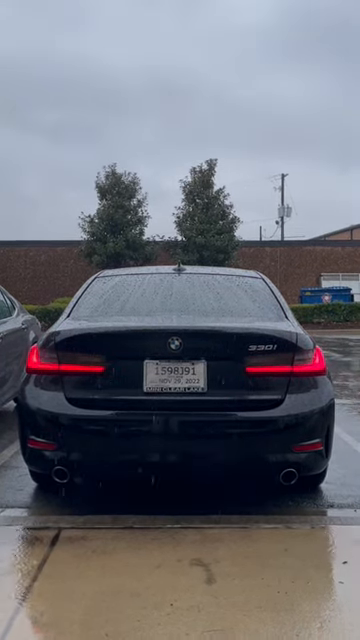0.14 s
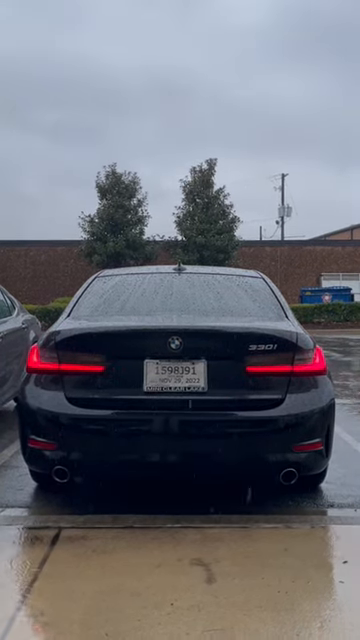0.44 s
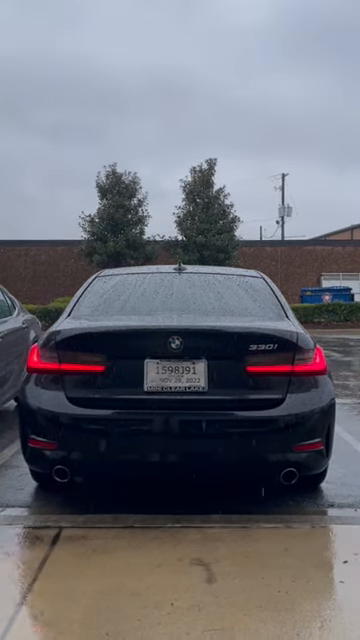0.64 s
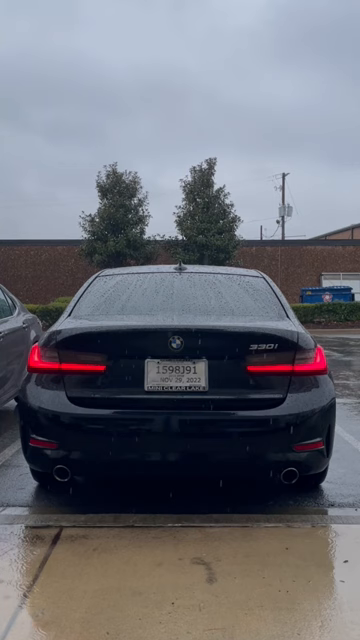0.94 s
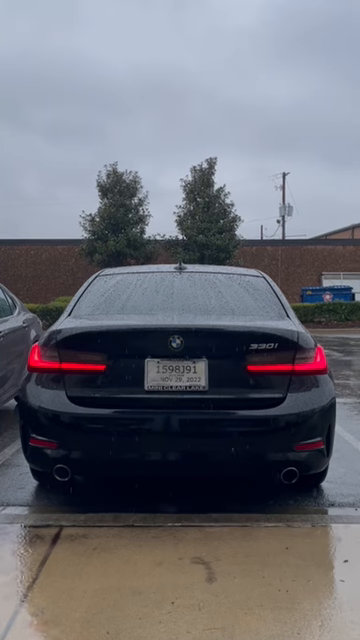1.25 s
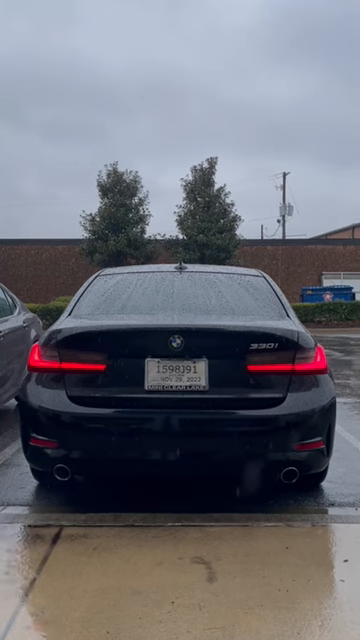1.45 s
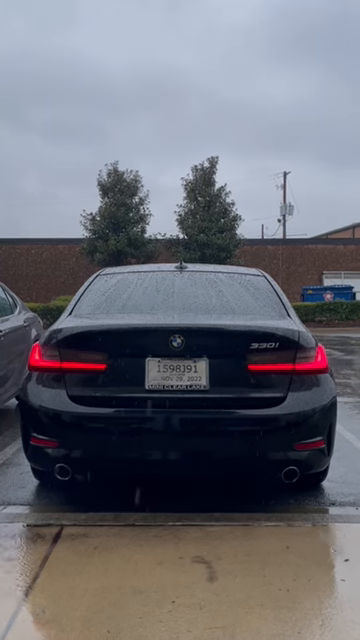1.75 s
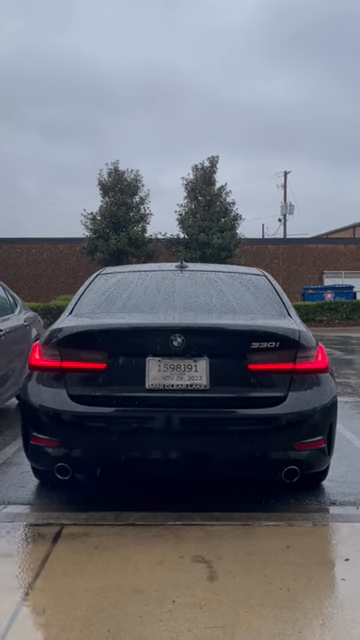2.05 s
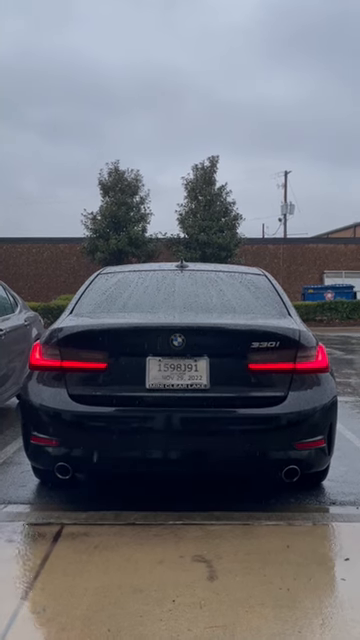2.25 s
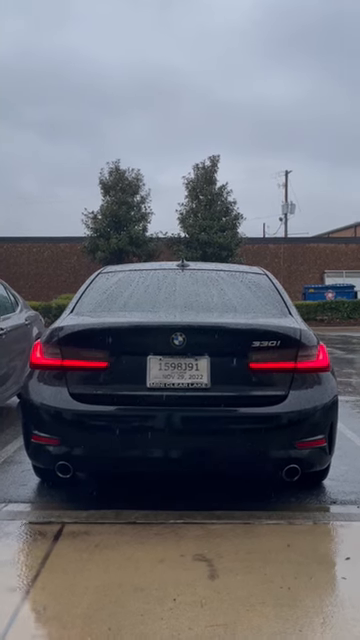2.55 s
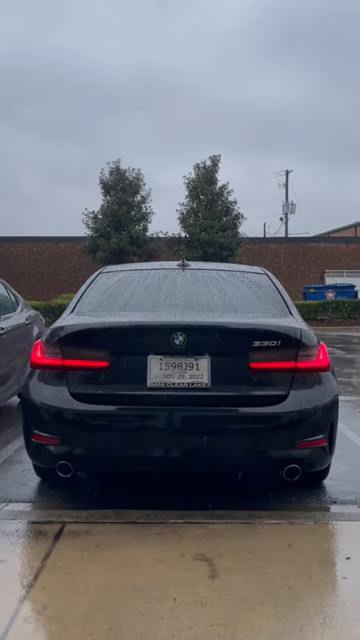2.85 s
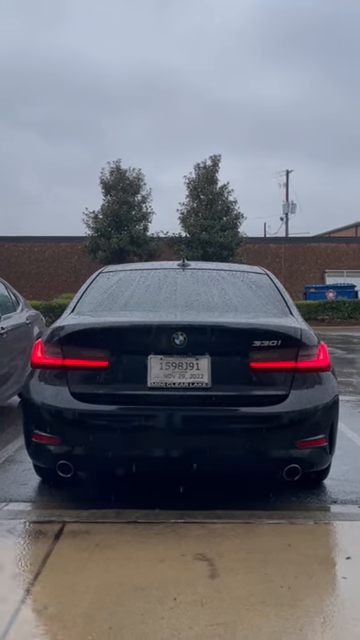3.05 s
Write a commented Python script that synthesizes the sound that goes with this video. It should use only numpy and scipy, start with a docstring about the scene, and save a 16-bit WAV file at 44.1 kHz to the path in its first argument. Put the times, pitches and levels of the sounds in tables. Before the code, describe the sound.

A parked car idles throughout, a low humming exhaust throb with breathy pulsing gas and hollow pipe ringing, heard outdoors from a few metres behind. It sags until 1.25 s, picks up slightly until about 1.9 s, then slows to the end. Drizzle hisses, its treble swelling until 1.6 s. Tiny drops tick throughout, sharpest near 0.38 s; faint thin whines pass at 0.5-0.8 s.

```python
"""A parked four-cylinder car idles in light rain, heard from a few metres behind its tailpipes.
From the start its firings hum in the exhaust, and each puffs out gas that rushes and rings the pipe.
Drizzle hisses throughout, with an unsteady treble hiss on top that swells until 1.6 s.
Drops tick on the ground and bodywork, the loudest near 0.38 s; faint whines pass from 0.5 to 0.8 s.
The idle sags until 1.25 s, picks up until about 1.9 s, then sags again to its slowest at the end."""
import sys
import numpy as np
from scipy import signal
from scipy.fft import rfft, irfft
from scipy.io import wavfile
from scipy.ndimage import uniform_filter1d

SR = 44100
rng = np.random.default_rng(int(sys.argv[2]) if len(sys.argv) > 2 else 0)


def inscribe(sig):
    """Save sig as 16-bit PCM at rate SR to the path in sys.argv[1].

    A 1-D sig is mono; a 2-D sig holds one channel per row.
    Samples are clipped to [-1, 1] before scaling.
    """
    pcm = np.round(np.clip(np.atleast_2d(sig).T, -1, 1) * 32767)
    wavfile.write(sys.argv[1], SR, pcm.astype(np.int16))


N = 141120


def undb(db):
    """Turn decibels into a gain."""
    return 10 ** (np.asarray(db) / 20)


def unit(x):
    """Scale a sound to an rms (average strength) of 1."""
    return x / np.sqrt(np.mean(x ** 2))


def pan(x, left_minus_right_db):
    """Place a sound by making one side louder and the other softer."""
    return x * undb(np.array([[left_minus_right_db], [-left_minus_right_db]]) / 2)


def read_curve(x, points):
    """Read a curve at x, with straight lines between its points."""
    return np.interp(x, *np.array(points).T)


def wander(rate_hz):
    """A smooth random curve with a spread near 1: random steps, averaged twice."""
    step = int(SR / rate_hz)
    steps = np.repeat(rng.standard_normal(N // step + 1), step)
    smooth = uniform_filter1d(uniform_filter1d(steps, step), step)
    return 1.4 * smooth[:N]


def noise(spectrum):
    """Random noise of rms 1, its pitch balance shaped by (frequency [Hz], level [dB]) points."""
    hz, db = np.array(spectrum).T
    freqs = np.maximum(np.fft.rfftfreq(N, 1 / SR), 1)
    gain = undb(np.interp(np.log(freqs), np.log(hz), db))
    return unit(irfft(rfft(rng.standard_normal(N)) * gain, N))


def resonate(x, hz, width_hz):
    """Ring at one pitch; filtering twice makes the resonance's skirts steep."""
    b, a = signal.iirpeak(hz, hz / width_hz / np.sqrt(2), fs=SR)
    once = signal.lfilter(b, a, x)
    return signal.lfilter(b, a, once)


def hum(t, firing, speed_hz):
    """Exhaust pulses make tones at multiples of the firing rate; unequal cylinders add half multiples."""
    # the strongest multiples of the firing rate
    strong_orders = (1, 2, 3, 4, 6)
    # strong multiples: (time [s], level of 1st [dB], of 2nd [dB], of 3rd [dB], of 4th [dB], of 6th [dB])
    strong_levels = [(0.04, -26, -28.5, -24, -49, -35.5), (0.1, -29, -27.5, -37, -50.5, -41.5),
                     (0.176, -29.0, -25.5, -23.0, -44, -43.5), (0.256, -33, -23.5, -39, -43.5, -45),
                     (0.31, -31, -21.5, -30.0, -39, -37.5), (0.42, -31.0, -24.0, -31.5, -42.5, -33.5),
                     (0.51, -30.5, -34.0, -32.5, -41, -32.5), (0.57, -34, -31, -31.5, -39, -34),
                     (0.65, -33, -30.5, -43, -38.5, -31), (0.81, -36.5, -30.0, -27.5, -33.5, -32.5),
                     (0.88, -36, -33.5, -35, -36, -32), (1.33, -38, -34.0, -31, -34.5, -33.5),
                     (1.439, -38, -31.5, -29.5, -32.0, -26.5), (1.67, -37.5, -31.5, -30.5, -38, -34),
                     (2.2, -36.5, -28, -30.5, -41.5, -35), (2.54, -40.0, -31, -28, -36.5, -30.0),
                     (2.68, -42.0, -34, -31.5, -35, -33), (2.87, -46, -36.5, -31, -31, -28.5),
                     (3.2, -47.0, -39, -35.5, -37, -36)]
    # what the pipe lets through of a weaker multiple: (frequency [Hz], level [dB])
    pipe_tone = [(103, -51), (143, -41), (187, -64.5), (212, -47.5), (229, -40.5), (272, -51.5), (287, -45),
                 (308, -56.5), (337, -42.5), (372, -58), (402, -50), (425, -59), (446, -48.5), (488, -53),
                 (508, -44), (528, -54), (560, -61.5), (597, -53), (640, -63), (730, -60), (850, -66.5)]
    waver_db, drift = 0.2144, 0.05  # dB and radians, both growing with the order
    overtone_waver_db, overtone_drift = 3, 0.42  # dB and radians
    jitter_s, crank_wander = 0.00007, 0.05  # firings run early or late, in seconds and radians
    pipe_spread = 0.089  # the pipe delays high orders more, in radians per order squared
    silencer_hz, silencer_width_hz = 60, 24
    pan_db_per_hz = 0.0065

    phase = firing + 2 * np.pi * speed_hz * jitter_s * wander(60) + crank_wander * wander(11)
    times, *levels = np.array(strong_levels).T
    tones = []
    for order, level in zip(strong_orders, levels):
        db = np.interp(t, times, level) + waver_db * order * wander(12)
        hz = order * speed_hz
        # far above its resonance the silencer delays a tone by nearly half a cycle
        silencer_lag = np.arctan2(hz * silencer_width_hz, silencer_hz ** 2 - hz ** 2)
        lag = silencer_lag + pipe_spread * order ** 2 + drift * order * wander(7.04)
        tones.append((order, db, lag))

    overtone_orders = [k / 2 for k in range(3, 40) if k / 2 not in strong_orders]
    for order in overtone_orders:
        # a tone swells as the changing speed slides it through a pipe resonance
        db = read_curve(order * speed_hz, pipe_tone) + overtone_waver_db * wander(7)
        lag = rng.uniform(0, 2 * np.pi) + overtone_drift * wander(5.99)
        tones.append((order, db, lag))

    out = np.zeros((2, N))
    for order, db, lag in tones:
        tone = np.sqrt(2) * undb(db) * np.cos(order * phase - lag)
        out += pan(tone, pan_db_per_hz * order * speed_hz.mean())
    return out


def exhaust_gas(firing, speed_hz):
    """A puff of gas at each firing rushes out as noise and rings the pipe's resonances."""
    # exhaust resonances: (frequency [Hz], width [Hz], level [dB], left minus right [dB])
    pipe_rings = [(135, 30, -47.5, -2), (249.4, 33, -44, 0.5), (466, 35, -52, 1.5), (508.7, 8.2, -49, 7.5),
                  (598, 16, -56.5, 11), (1044, 33, -62.5, 17.5), (2577, 92, -61, -4.5)]
    # tone balance of the gas rush: (frequency [Hz], relative level [dB per Hz])
    rush_spectrum = [(20, -36), (40, -12), (90, 1.5), (190, -6), (300, -4), (450, -7), (700, -7),
                     (1100, -10.5), (1500, -18.5), (3000, -26), (8000, -59.5)]
    throb = 0.38  # how strongly the gas pulses with the firings
    rush_db, rush_pan_db = -43.5, 6.5
    rush_db_per_hz = 0.9  # the rush grows with engine speed

    puff = unit(np.exp(throb * np.cos(firing)))
    flow = puff * rng.standard_normal(N)
    rings = np.zeros((2, N))
    for hz, width_hz, db, side_db in pipe_rings:
        rings += pan(undb(db) * unit(resonate(flow, hz, width_hz)), side_db)
    rush_level = undb(rush_db + rush_db_per_hz * (speed_hz - speed_hz.mean()))
    rush = rush_level * puff * noise(rush_spectrum)
    return rings + pan(rush, rush_pan_db)


def drizzle(t):
    """Fine rain and open air: noise makes a wide hiss, with an unsteady treble hiss on top."""
    # hiss shared by both sides: (frequency [Hz], relative level [dB per Hz])
    shared_spectrum = [(200, -2), (1000, 0.5), (1600, 0), (3000, -3.5), (4600, -5), (5600, -6),
                       (7800, -6.5), (8600, 1), (9500, -15.5), (12000, -7), (13500, -15), (15500, -26)]
    # hiss that differs between the sides: (frequency [Hz], relative level [dB per Hz])
    wide_spectrum = [(150, -7), (500, 6), (750, 9), (1150, 4.5), (1700, -13), (2600, -0.5), (4900, 0.5),
                     (6500, -5), (8200, -13), (9400, -45), (10800, -34.5), (12000, -8), (13300, -7.5),
                     (14500, -34)]
    # the treble hiss: (frequency [Hz], relative level [dB per Hz])
    treble_spectrum = [(2500, -16), (5000, -3.5), (7000, -0.5), (8800, 2.5), (9600, -13), (13000, -10),
                       (15500, -18)]
    # the treble hiss swells and eases: (time [s], level [dB])
    treble_swell = [(.5, -1), (1.6, 3.5), (3.2, -2.5)]
    shared_db, wide_db, waver_db = -46, -51, 0.78
    treble_db, treble_waver_db = -54.5, 3.5

    mid = undb(shared_db) * noise(shared_spectrum)
    side = undb(wide_db) * noise(wide_spectrum)
    hiss = np.array([mid + side, mid - side]) * undb(waver_db * wander(12.02))
    treble = undb(treble_db + treble_waver_db * wander(24.12)) * noise(treble_spectrum)
    return hiss + treble * undb(read_curve(t, treble_swell))


def add_drop(out, splash, start, db, hz, ring_s, pan_db):
    """Add one drop: its strike makes a ping and a noisy splash that die away together."""
    splash_db, attack_s = -4.5, 0.00089
    i = int(start * SR)
    age = np.arange(min(SR // 16, N - i)) / SR
    strike = np.sin(2 * np.pi * hz * age) + undb(splash_db) * splash[i:i + len(age)]
    envelope = np.exp(-age / ring_s) * (1 - np.exp(-age / attack_s))
    out[:, i:i + len(age)] += pan(undb(db) * strike * envelope, pan_db)


def drips():
    """Drops tick on the ground and bodywork: a few near ones over a random patter of far ones."""
    # near drops: (time [s], level before the rise and decay [dB], pitch [Hz], ring time [s])
    near_drops = [(.045, -40, 5200, .006), (.376, -22, 4420, 0.0021), (.377, -35.5, 2180, 0.0043),
                  (.38, -33.5, 5110, 0.0096), (0.3851, -24, 4700, 0.0014), (.508, -37, 4620, 0.0064),
                  (.688, -35, 4387, 0.0049), (.945, -37, 5030, .0049), (1.049, -34.5, 3540, .0074),
                  (1.159, -37.5, 5100, 0.0054), (1.417, -41, 4590, .012), (1.859, -38, 4640, .005),
                  (1.9, -37.5, 5320, 0.0063), (1.972, -38.5, 4820, .0065), (2.115, -39, 4040, .005),
                  (2.271, -39.5, 4100, .006), (2.844, -37.5, 4139, .0049), (3.078, -44, 5100, 0.0051)]
    # tone balance of a splash: (frequency [Hz], relative level [dB per Hz])
    splash_spectrum = [(800, -29), (2200, -3), (4600, 5), (6000, -12), (13000, -24)]
    near_pan_db = -1.5
    patter_per_s, patter_db, patter_scatter_db = 90, -45.5, 2.1
    patter_hz, patter_ring_s = 4424, 0.0039  # the middle pitch, and how long each rings

    out, splash = np.zeros((2, N)), noise(splash_spectrum)
    for start, db, hz, ring_s in near_drops:
        add_drop(out, splash, start, db, hz, ring_s, near_pan_db)
    count = int(patter_per_s * N / SR)
    starts = rng.uniform(0, (N - 1) / SR, count)
    for start, (size, pitch, place) in zip(starts, rng.standard_normal((count, 3))):
        db = patter_db + patter_scatter_db * size
        hz = patter_hz * np.exp(0.35 * pitch)
        add_drop(out, splash, start, db, hz, patter_ring_s, 4 * place)
    return out


def whines(t):
    """Thin sine tones of unsteady phase that swell and fade."""
    # faint brief whines: (start [s], length [s], frequency [Hz], level at the height of the swell [dB])
    whine_list = [(0.603, 0.17, 890, -44), (0.5, 0.26, 1826, -51)]
    waver = 0.66  # radians
    out = np.zeros(N)
    for start, length, hz, db in whine_list:
        swell = np.sin(np.pi * np.clip((t - start) / length, 0, 1))
        out += undb(db) * swell * np.sin(2 * np.pi * hz * t + waver * wander(50))
    return out


def scene():
    """The idling car in the rain: one firing rhythm drives both the hum and the gas."""
    # engine speed: (time [s], firing rate [firings per second])
    idle_speed = [(0.0, 46.2), (0.15, 45.1), (0.4, 43), (0.6, 42.5), (0.8, 41.08), (1.05, 40.52),
                  (1.25, 40.2), (1.45, 41), (1.65, 40.7), (1.85, 42.2), (2.05, 42.07), (2.25, 42),
                  (2.5, 41.2), (2.7, 40.7), (2.95, 40.2), (3.2, 38.5)]
    first_firing_s = 0.018
    t = np.arange(N) / SR
    speed_hz = read_curve(t, idle_speed)
    # adding up the speed gives the firing phase in radians
    firing = 2 * np.pi * (np.cumsum(speed_hz) / SR - speed_hz[0] * first_firing_s)
    car = hum(t, firing, speed_hz) + exhaust_gas(firing, speed_hz)
    return car + drizzle(t) + drips() + whines(t)


def record(dry):
    """Two microphone openings hear the scene slightly out of step; the top is cut."""
    # how far the left opening leads the right: (frequency [Hz], phase [radians])
    port_phase = [(0, 0), (400, 0.12), (700, 1), (1150, 0.05), (1700, 0.04), (3000, 1.13), (4700, 1.5),
                  (5400, 0.31), (8000, 2), (9200, 3), (11000, 3), (14000, 7)]
    edge_s, top_hz = 0.004, 15200  # fade at each end, and the highest pitch kept
    lead = read_curve(np.fft.rfftfreq(N, 1 / SR), port_phase)
    faded = dry * signal.windows.tukey(N, 2 * edge_s * SR / N)
    # half the lead goes to each side, in opposite directions
    shift = np.exp(0.5j * np.array([lead, -lead]))
    ports = irfft(rfft(faded) * shift, N)
    top_cut = signal.ellip(8, 0.2, 80, top_hz, fs=SR, output="sos")
    return signal.sosfilt(top_cut, ports)


dry = scene()
out = record(dry)
inscribe(out)
```